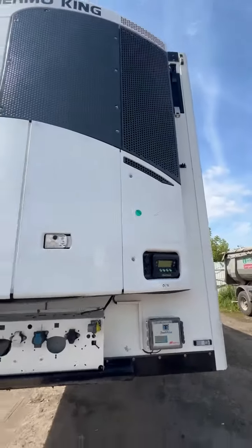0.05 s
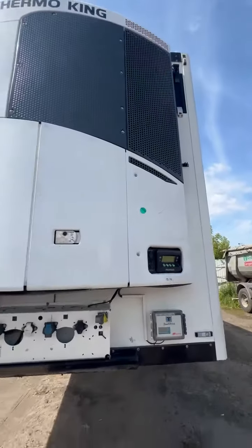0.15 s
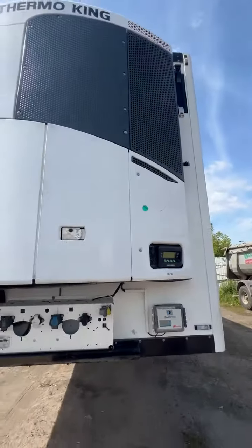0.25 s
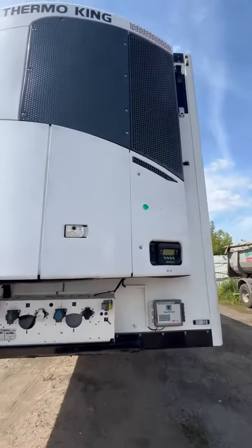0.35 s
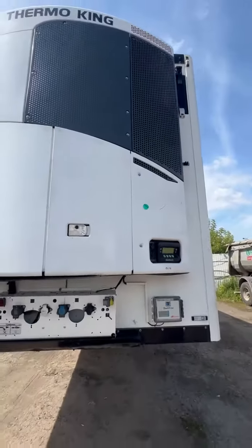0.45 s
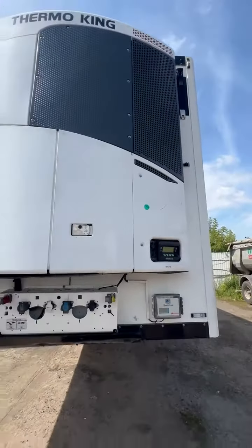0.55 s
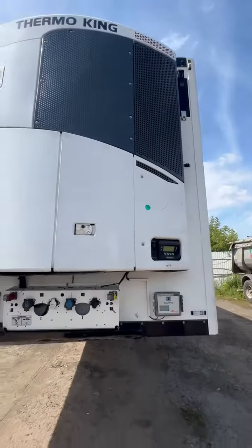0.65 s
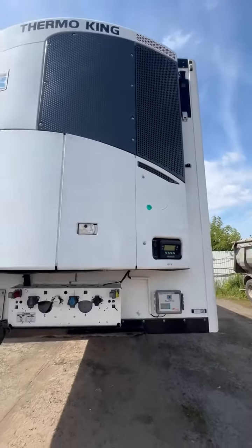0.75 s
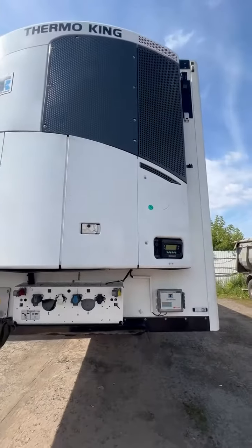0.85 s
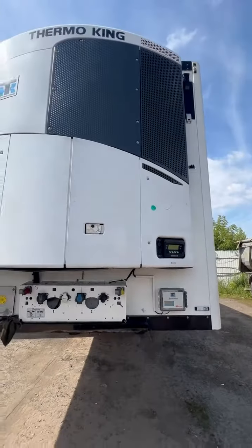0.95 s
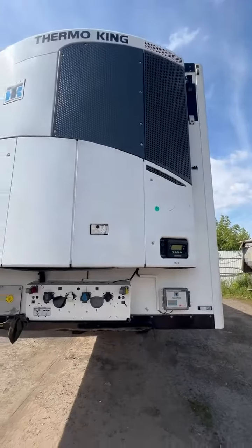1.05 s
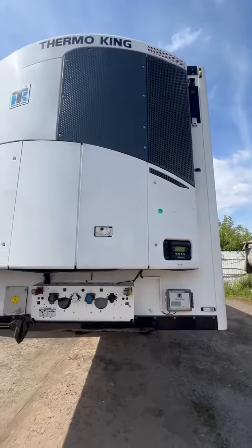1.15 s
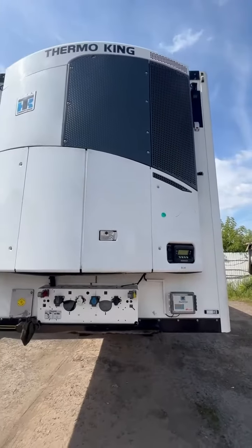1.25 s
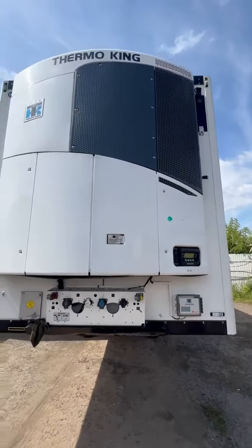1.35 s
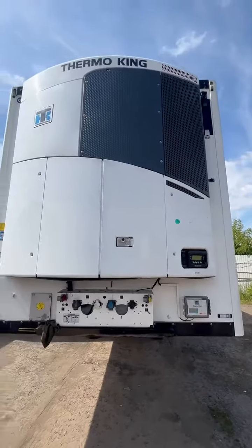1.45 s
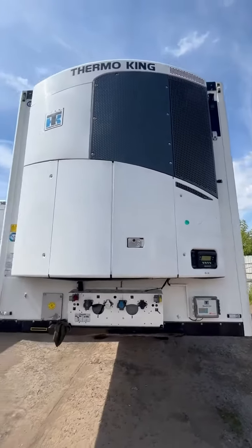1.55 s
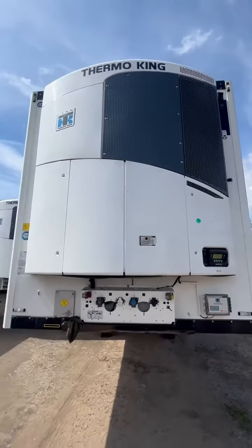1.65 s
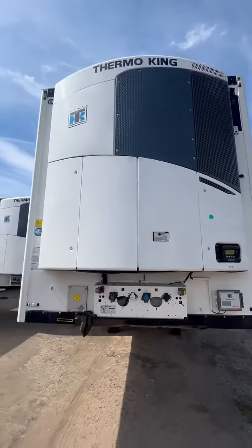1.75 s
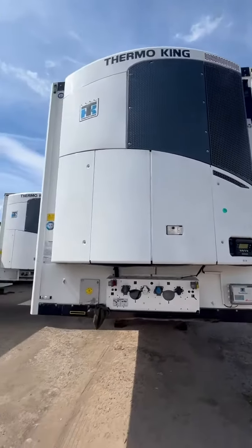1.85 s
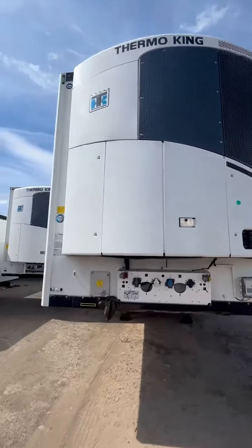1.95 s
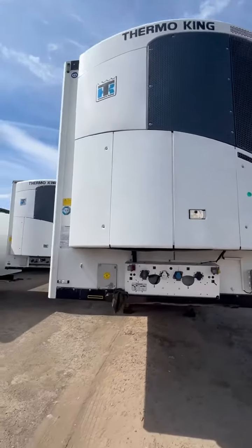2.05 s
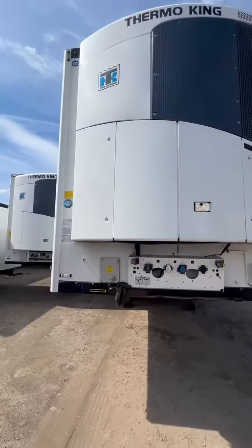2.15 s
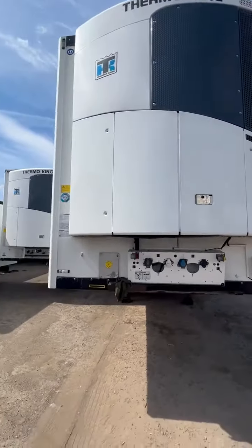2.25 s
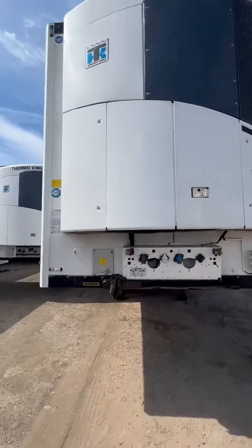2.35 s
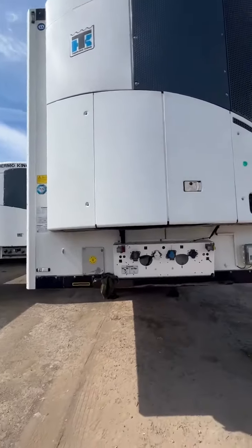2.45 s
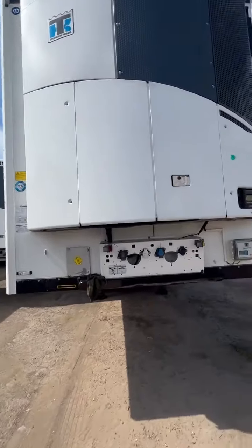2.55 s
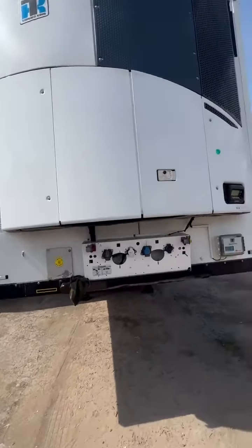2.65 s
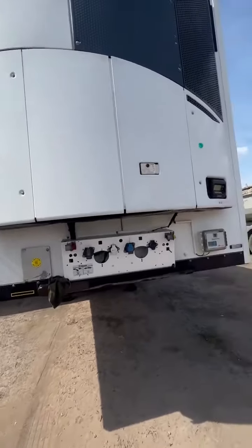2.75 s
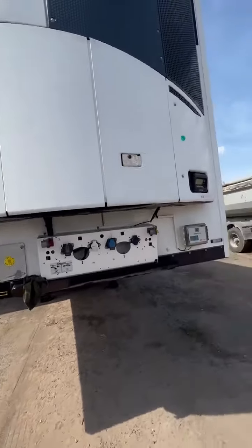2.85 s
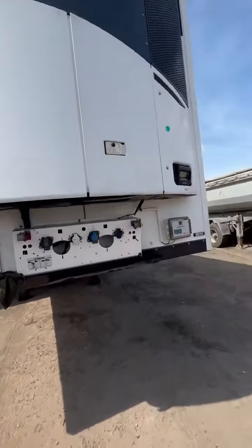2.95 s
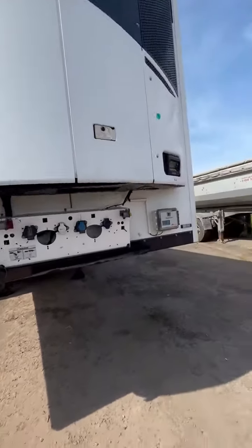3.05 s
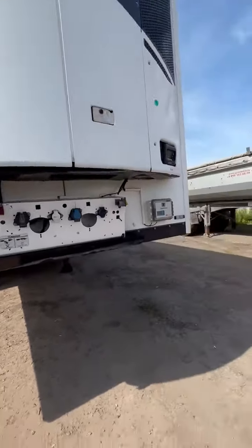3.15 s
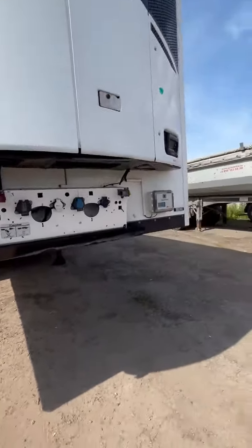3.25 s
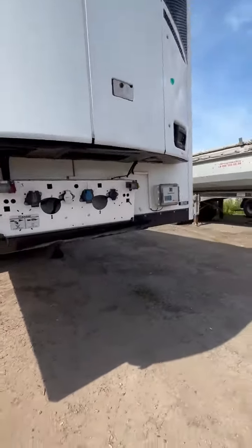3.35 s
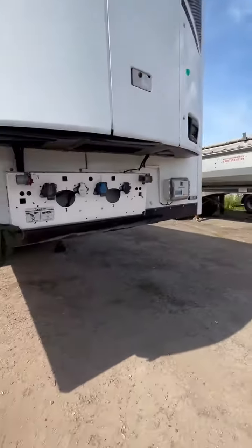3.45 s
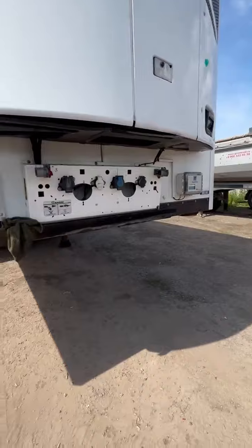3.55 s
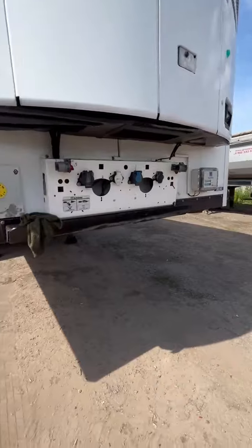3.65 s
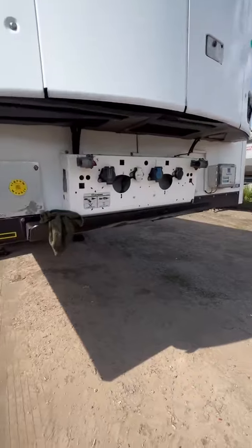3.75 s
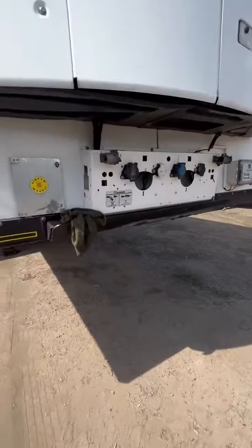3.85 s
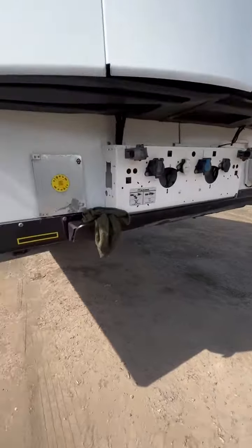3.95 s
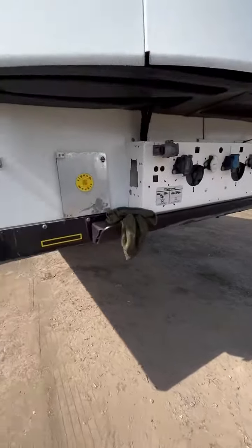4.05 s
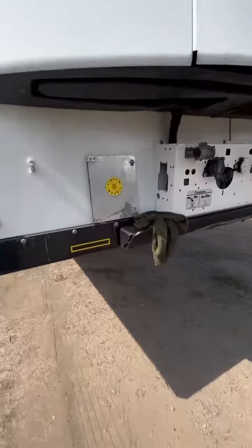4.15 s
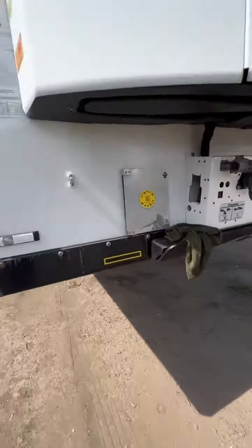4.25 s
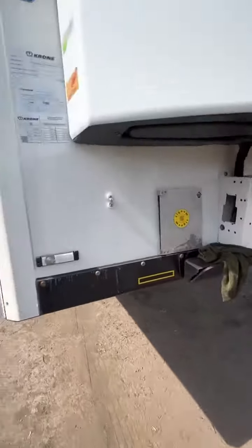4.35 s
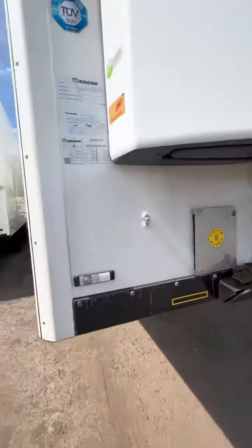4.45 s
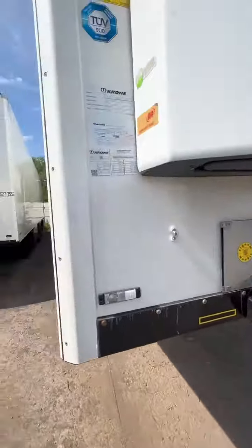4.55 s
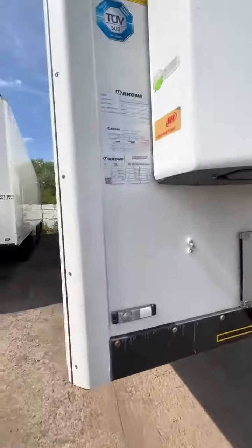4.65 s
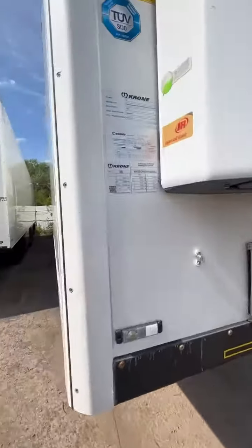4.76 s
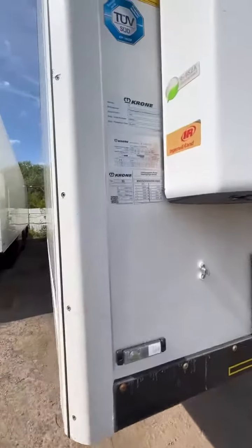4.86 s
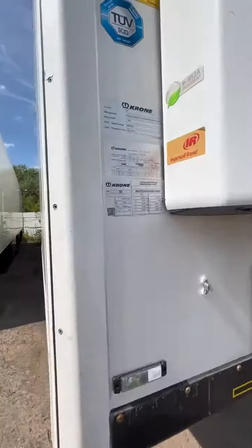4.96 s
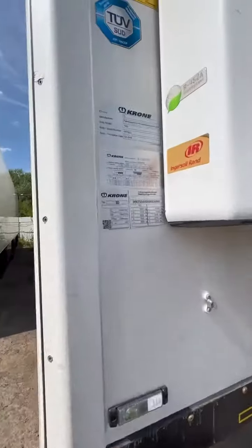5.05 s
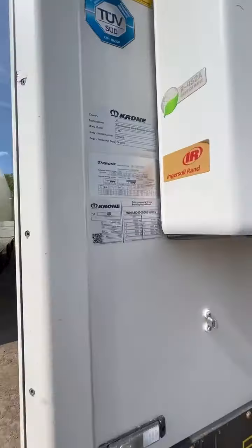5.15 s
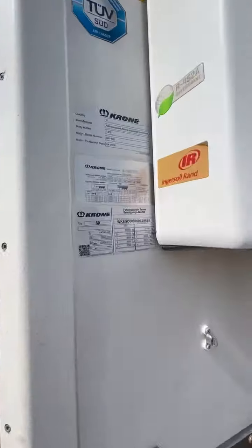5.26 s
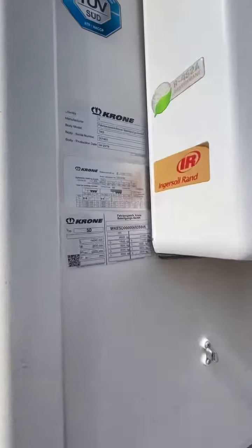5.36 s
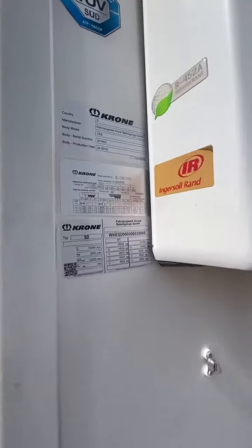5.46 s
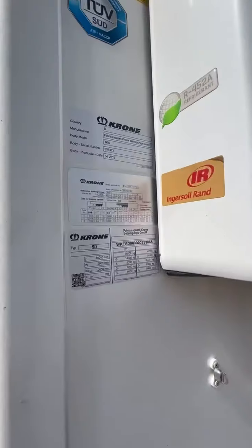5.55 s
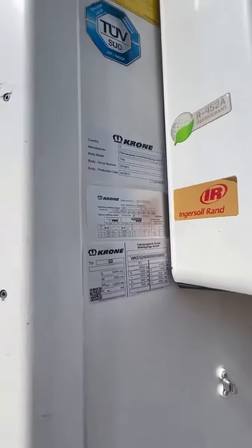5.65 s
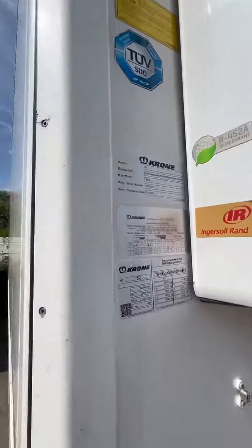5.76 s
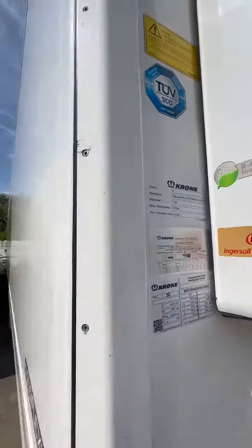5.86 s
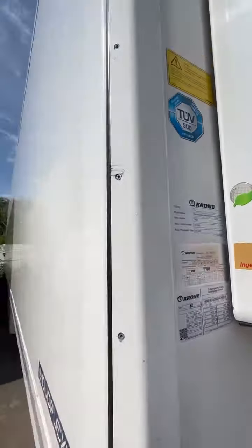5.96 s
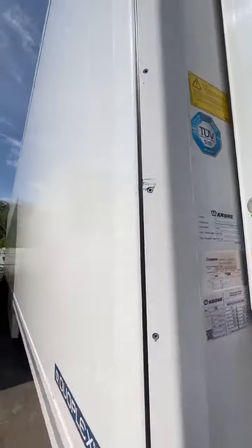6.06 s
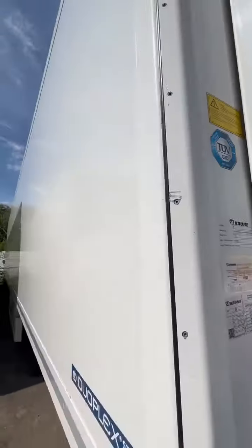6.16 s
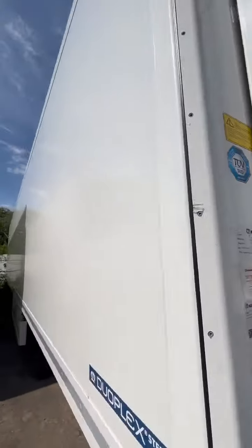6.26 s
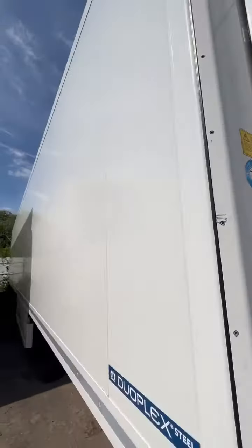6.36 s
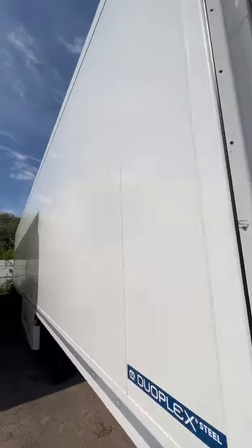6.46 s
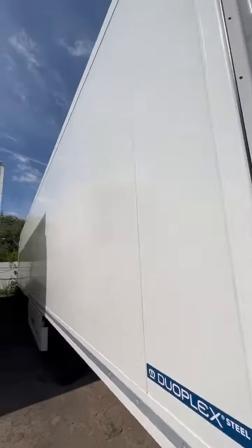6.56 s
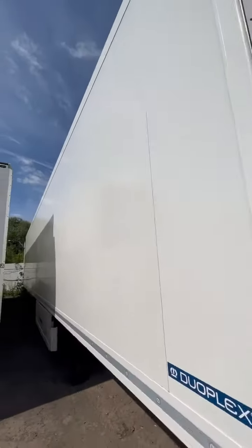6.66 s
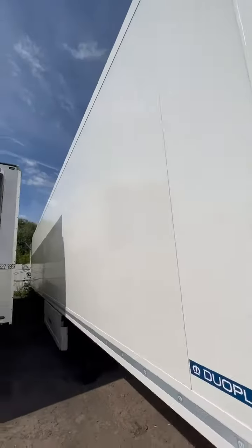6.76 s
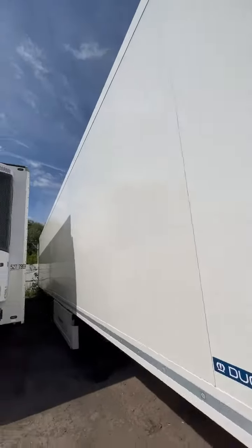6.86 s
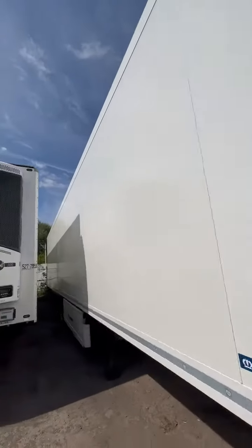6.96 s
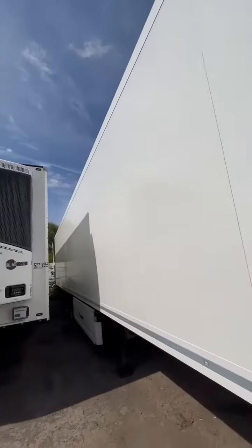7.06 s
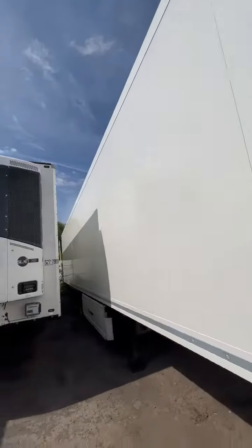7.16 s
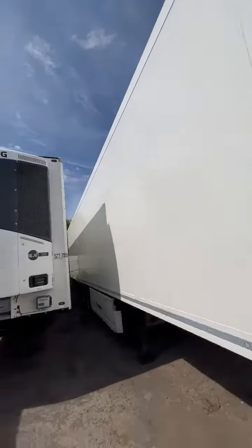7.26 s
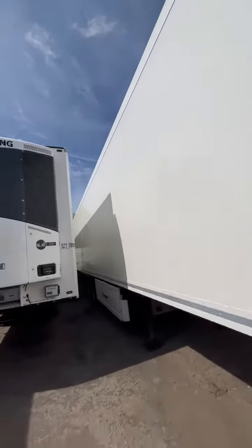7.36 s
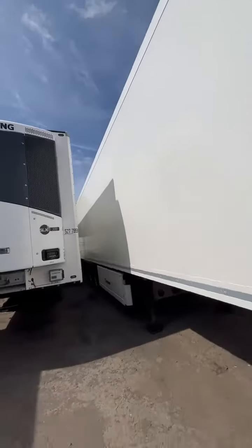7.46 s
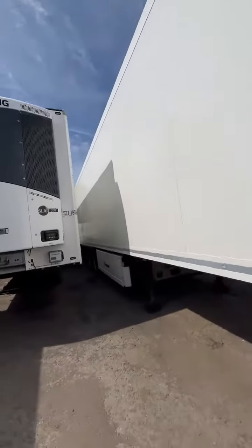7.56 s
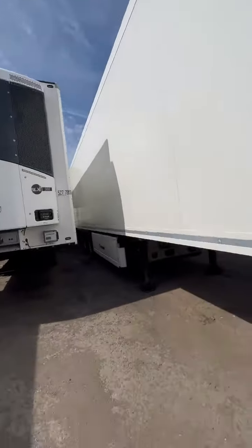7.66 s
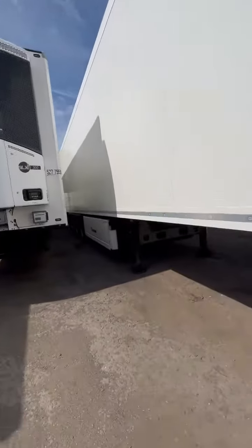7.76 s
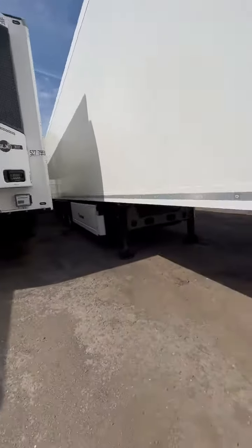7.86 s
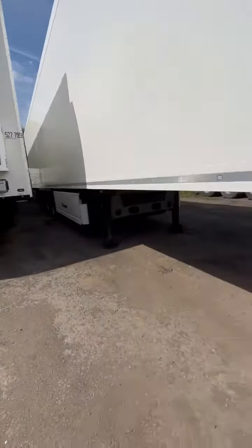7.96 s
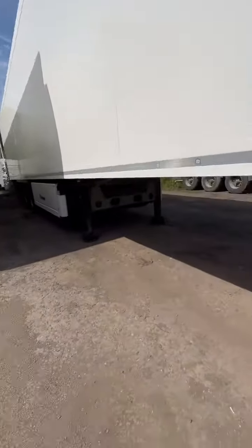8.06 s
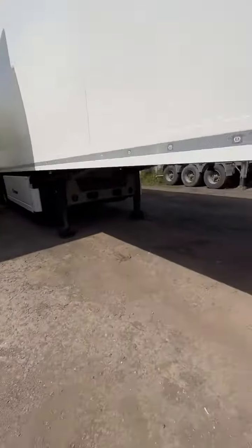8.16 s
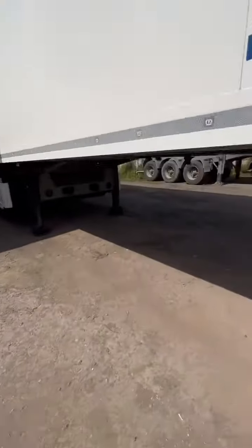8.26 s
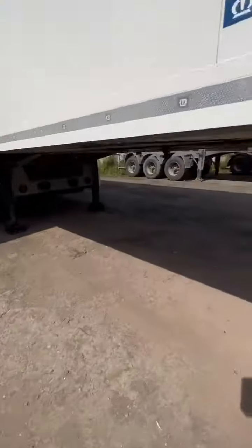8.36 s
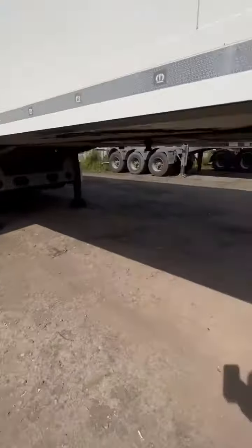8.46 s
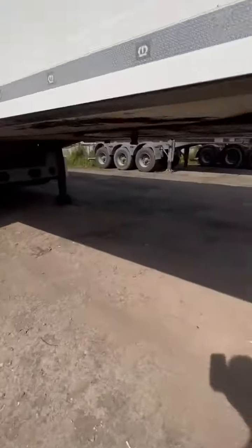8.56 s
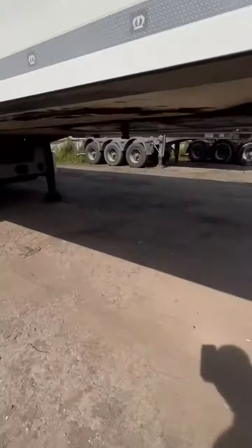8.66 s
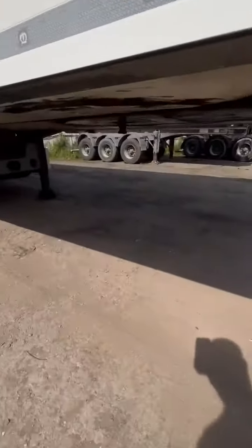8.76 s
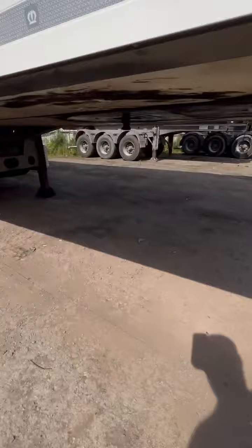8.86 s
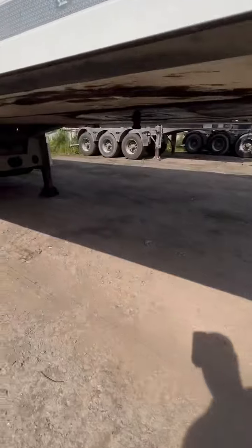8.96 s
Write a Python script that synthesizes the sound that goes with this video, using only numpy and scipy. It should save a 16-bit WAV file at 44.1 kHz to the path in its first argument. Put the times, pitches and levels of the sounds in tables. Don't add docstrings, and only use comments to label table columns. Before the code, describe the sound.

A handheld microphone passes a running trailer refrigeration engine in an open yard. A steady low throb carries quick metallic clatter, light tapping and blowing fan air. Close below the unit it becomes louder and boomier, with lumpy wind bumps strongest just before six seconds. Along the trailer side the clatter and hiss recede, leaving muffled drone and rumble with small stones clicking near the end.

```python
import sys
import numpy as np
from scipy import signal
from scipy.fft import rfft, irfft
from scipy.io import wavfile
from scipy.ndimage import uniform_filter1d, minimum_filter1d

SR = 44100
rng = np.random.default_rng(int(sys.argv[2]) if len(sys.argv) > 2 else 0)


def volts_from_db(level):
    exponent = np.asarray(level, float) / 20
    return 10 ** exponent


def store_pcm(level_fs):
    pcm = np.round(np.clip(level_fs, -1, 1) * 32767).astype(np.int16)
    wavfile.write(sys.argv[1], SR, np.atleast_2d(pcm).T)


N = 397782
T = np.arange(N) / SR
FIRING_HZ = 49.46

# (time [s], nearness [dB], open view of the grille [dB],
#            extra path of the ground echo [m], extra path of the wall echo [m])
WALK = [(0, 0, 0, 1.05, 3.05), (.9, -.8, -.4, 1.08, 2.97), (1.8, -.9, -.9, 1.23, 2.95),
        (2.4, .3, .3, 1.24, 2.86), (3, 1.2, 2.4, 1.02, 2.78), (3.5, 2.7, 1.9, 1.94, 3.16),
        (4.2, 4.4, 1.5, 2.08, 3.09), (4.8, 5.5, 1.6, 1.81, 3), (5.5, 6.9, 2.5, 1.92, 3.09),
        (6, 3.8, 0, 2.09, 3.16), (6.6, -.1, -4.6, 1.97, 3.03), (7.2, -3, -10.2, 1.77, 2.45),
        (7.8, -2.7, -12.8, 1.33, 1.97), (8.4, 2.2, -11.5, 1.08, 1.9), (9.02, 1.8, -11.5, .78, 1.6)]
STATIONS = [
    1.8,
    3.2,
    4.4,
    5.8,
    7.3,
    8.6,
]
# (time [s], hidden share of the housing [0-1])
CORNER = [
    (6.2, 0.0083),
    (7.3, 0.54),
]
# (time [s], side share)
FACING = [(0, 1.2), (2.5, 1.2), (4, 0.66), (5.5, 0.95), (6.4, 0.18), (7.2, -0.29), (8.2, 0.83),
          (9.02, -0.17)]
# (frequency [Hz], likeness [0-1], left-right [dB], left leads [rad])
PORTS = [(60, 1, 0.5, 0.076), (202, 1, -1.4, 0.018), (400, 1, 3.5, 0.72), (720, 0.77, 5, 1.95),
         (1115, 0.089, 9.5, 2.83), (1540, 0.68, 1, 5.92), (2480, 1, -1, 4.68), (5350, 0.09, 1.5, 6),
         (9000, 0.57, -1, 5.17)]
CYLINDERS = [-5, 0, -1.6, -7]


def evened(x):
    return x / np.sqrt(np.mean(x ** 2) + 1e-20)


def read(points, hz, axis=1):
    points = np.array(points)
    return np.interp(np.log(hz + 1), np.log(points[:, 0] + 1), points[:, axis])


def curve(rows, axis=1):
    rows = np.array(rows)
    return np.interp(T, rows[:, 0], rows[:, axis])


def drift(top_hz):
    coarse = T[::256]
    waves = 0
    for hz in np.geomspace(.15, top_hz, 16):
        waves = waves + np.sin(2 * np.pi * (hz * coarse + rng.random())) / np.sqrt(hz)
    return np.interp(T, coarse, evened(waves))


def heard(start_db, near, view):
    return start_db + near * curve(WALK, axis=1) + view * curve(WALK, axis=2)


def echoes(hz):
    ground, wall, sound_m_per_s = .5, .64, 343
    lag = -2j * np.pi * hz / sound_m_per_s
    from_ground = ground * np.exp(lag * curve(WALK, axis=3))
    from_wall = wall * np.exp(lag * curve(WALK, axis=4))
    return 20 * np.log10(abs(1 + from_ground + from_wall) + .02)


def tone(turns, hz, level_db, loose=1):
    facing = curve(FACING)
    lean_db = read(PORTS, hz, axis=2) * facing / 2
    nearest_lead = np.angle(np.exp(1j * read(PORTS, hz, axis=3)))
    lead = nearest_lead * facing / 2
    angle = 2 * np.pi * (turns + loose * rng.random())
    left = volts_from_db(lean_db) * np.cos(angle + lead)
    right = volts_from_db(-lean_db) * np.cos(angle - lead)
    return np.sqrt(2) * volts_from_db(level_db) * np.array([left, right])


def spread(pair, colour, patchy_db, shade_db=0):
    hz, t, (a, b) = signal.stft(pair, SR, nperseg=1024, noverlap=768)
    patches = uniform_filter1d(rng.standard_normal(a.T.shape), size=40, axis=0)
    patches = uniform_filter1d(patches, size=8, axis=1)
    shape = volts_from_db(read(colour, hz)[:, None] + patchy_db * evened(patches).T)
    hidden = np.interp(t, *np.transpose(CORNER))
    shape *= volts_from_db(-shade_db * np.outer(np.log2(hz / 400 + 1), hidden))
    same = np.clip(read(PORTS, hz), 0, 1)[:, None]
    facing = np.interp(t, *np.transpose(FACING))
    lean = volts_from_db(np.outer(read(PORTS, hz, axis=2), facing) / 2)
    lead = np.exp(1j * read(PORTS, hz, axis=3))[:, None]
    left = lean * lead * a
    right = (same * a + np.sqrt(1 - same ** 2) * b) / lean
    out = signal.istft(shape * np.array([left, right]), SR, nperseg=1024, noverlap=768)[1][:, :N]
    return out / np.sqrt(np.mean(out.mean(0) ** 2))


def throb(fired, decay, floor):
    cylinder = fired.astype(int) % len(CYLINDERS)
    strength = volts_from_db(np.array(CYLINDERS)[cylinder])
    phase = fired % 1
    return evened(floor + strength * np.sqrt(phase / decay) * np.exp(-phase / decay))


def habit(fired, repeat):
    size = 3560
    place = (fired / len(CYLINDERS) % 1 * size).astype(int)
    turn = np.pi * (0.293 * T + 0.2 * drift(0.96))
    cycles = rng.standard_normal((2, 2, size))[:, :, place]
    fresh = np.sqrt(1 - repeat ** 2) * rng.standard_normal((2, N))
    return repeat * (cycles[0] * np.cos(turn) + cycles[1] * np.sin(turn)) + fresh


def hum(fired):
    # (firing multiple, level [dB])
    pipe = [(1, -27.5), (2, -21), (3, -29.5), (4, -34.5)]
    # (crank order, in front [dB], walking up [dB], in the nook below the unit [dB], along the side [dB])
    block = [(5, -45, -43, -42, -56), (7, -44, -54, -47, -49), (9, -54, -51, -47, -46),
             (10, -39, -38, -30, -46), (11, -36, -40, -35, -42), (12, -37, -41, -27, -38),
             (13, -46, -45, -40, -54), (14, -41, -33, -31, -47), (15, -42, -45, -38, -43),
             (16, -53, -41, -46, -49), (17, -52, -51, -39, -50), (18, -45, -45, -32, -46),
             (19, -47, -44, -36, -50), (20, -51, -46, -47, -55), (22, -53, -52, -42, -53),
             (23, -55, -57, -47, -58), (24, -51, -54, -45, -48), (25, -54, -62, -50, -60),
             (28, -56, -52, -40, -55), (29, -56, -60, -49, -62), (31, -62, -60, -51, -66),
             (32, -53, -56, -47, -66), (34, -61, -62, -45, -67), (38, -58, -62, -54, -68)]
    out = 0
    for k, db in pipe:
        level_db = db + curve(WALK) + echoes(round(k) * FIRING_HZ) + .5 * drift(6)
        out = out + tone(round(k) * fired, k * 21.0, level_db, loose=0)
    for order, front_db, near_db, nook_db, side_db in block:
        further_db = side_db - 3
        level_db = np.interp(T, STATIONS, [front_db, near_db, nook_db, nook_db, side_db, further_db])
        out += tone(order * fired / 2, order * 24.8, level_db + 1.8 * drift(2) + .5)
    return out


def knock(fired):
    # (frequency [Hz], level [dB])
    open_colour = [(800, -29), (1200, -2), (1450, -5), (1750, -1), (2250, -3), (2950, -4.5), (3600, -11),
                   (4200, -21), (5500, -30)]
    # (frequency [Hz], level [dB])
    shaded_colour = [(800, -40), (1200, -3), (1450, -10.5), (1750, -9), (2250, -2), (2800, -6), (3600, -11),
                     (4200, -17.5), (5500, -29)]
    drive = habit(fired, repeat=.65) * throb(fired, decay=.25, floor=.8)
    hidden = np.clip(curve(CORNER), 0, 1)
    facing = spread(drive, open_colour, patchy_db=1.03)
    shaded = spread(drive, shaded_colour, patchy_db=0.1)
    return volts_from_db(heard(-37.5, near=0.042, view=0.94)) * ((1 - hidden) * facing + hidden * shaded)


def taps(fired):
    # (place in the cycle [0-1], ring [Hz], in front [dB], close by [dB])
    tappings = [(.25, 1760, -32.5, -38), (.08, 1800, -38, -40), (.25, 1110, -39, -49),
                (.79, 1100, -44, -48), (.64, 2270, -43, -40), (.64, 2920, -41, -47), (.48, 1720, -42, -42),
                (.82, 2900, -49, -44), (.77, 1850, -40, -44)]
    ring_s, uneven_s, cycle_hz = .0022, .0004, 12.38
    shade_db = 1.4 * np.minimum(curve(WALK, axis=2), 0)
    out = 0
    for place, hz, *levels_db in tappings:
        cycles = fired / len(CYLINDERS) - place + 1
        late, strength, pitch = rng.standard_normal((120, 3))[cycles.astype(int)].T
        since = np.maximum(cycles % 1 / cycle_hz - uneven_s * (late + 2), 0)
        ring = since / ring_s * np.exp(1 - since / ring_s)
        uneven_db = .9 * strength + .7 * drift(1.5)
        turns = hz * (1 + .02 * pitch) * since
        level_db = np.interp(T, STATIONS[1:3], levels_db) + shade_db + uneven_db
        out = out + ring * tone(turns, hz, level_db)
    return out


def air(fired):
    # (frequency [Hz], level [dB])
    rumble_colour = [(22, -50), (34, -5), (60, 9), (85, -2), (120, 5.5), (170, -5.5), (230, 2), (300, -6.5),
                     (400, -8), (600, -48)]
    roar_colour = [(200, -50), (300, -14), (400, 1.5), (520, -1.5), (700, -4.5), (950, -8.5), (1130, -11),
                   (1400, -22.5), (1900, -47)]
    hiss_colour = [(3000, -40), (4000, 0.5), (5300, -0.5), (6000, 1), (7000, -3.5), (9500, -9.5),
                   (11500, -23), (14000, -36)]
    # (time [s], level
    # [dB])
    nook = [(1.8, 5), (2.3, 0), (3.2, 3), (4.9, -2), (5.4, 3), (5.9, 1), (7.4, 7), (8.3, 0.5)]
    # (time [s], level [dB])
    outlet = [(3.1, -3), (3.55, -0.5), (4.2, 2), (4.45, -3), (5.7, -1.5), (6.4, 0), (7.5, -2), (8.4, 0)]
    blade_hz, blade_db = 252.4, -35.5
    rumble = spread(rng.standard_normal((2, N)), rumble_colour, patchy_db=.4)
    shaken = habit(fired, repeat=.4) * throb(fired, decay=0.19, floor=2.9)
    roar = spread(shaken, roar_colour, patchy_db=2.0, shade_db=3.5)
    pulsing = rng.standard_normal((2, N)) * throb(fired, decay=.3, floor=1.8)
    hiss = spread(pulsing, hiss_colour, patchy_db=.7)
    blade_level_db = blade_db + curve(WALK) + echoes(blade_hz) + 0.6 * drift(1.1)
    out = tone(blade_hz * T, blade_hz, blade_level_db)
    out += volts_from_db(heard(-29, near=0.52, view=0.28)) * rumble
    out += volts_from_db(heard(-38, near=1, view=0.15) + curve(nook)) * roar
    flutter_db = .9 * drift(14)
    out += volts_from_db(heard(-45, near=-0.51, view=1.07) + curve(outlet) + flutter_db) * hiss
    return out


def buffet():
    # (frequency [Hz], level per Hz [dB])
    draught_colour = [(20, -45), (40, -26), (80, 7), (275, -15), (460, -13.5), (850, -29), (1300, -35),
                      (2000, -58)]
    # (time [s], level [dB], length [s])
    gusts = [(2.709, -28.5, 0.18), (2.913, -28, 0.14), (3.72, -31, 0.13), (3.967, -27, 0.066),
             (4.177, -24, 0.27), (4.445, -29, 0.058), (4.914, -23, 0.26), (5.26, -24, 0.06),
             (5.55, -18, 0.1), (5.686, -22, 0.054), (5.831, -13, 0.041), (6.013, -18, 0.14),
             (6.235, -30, 0.073), (7.1, -28.5, 0.18), (8.645, -31, 0.037), (8.947, -30, 0.19)]
    hz = np.fft.rfftfreq(N, 1 / SR)
    noise = rfft(rng.standard_normal((2, N)))
    push = evened(irfft(noise * volts_from_db(read(draught_colour, hz)), N))
    swell = 0
    for s, db, length in gusts:
        swell = swell + volts_from_db(db - 3.0) * np.exp(-((T - s) / (0.43 * length)) ** 2)
    lumps = swell * volts_from_db(1.5 * drift(30))
    return lumps * (np.array([push[0], -push[0]]) + 0.22 * push[1])


def ticks():
    # (time [s], peak level [dB], ring [Hz])
    grit = [
        (7.0569, -51, 2873),
        (7.2624, -47, 1630),
        (7.7034, -39, 2180),
        (7.9473, -34, 2360),
        (8.0511, -31, 1940),
        (8.2294, -48, 1710),
        (8.4312, -43, 2130),
        (8.4891, -29, 2360),
        (8.5694, -30, 1620),
        (8.9044, -35.5, 4600),
    ]
    out, t = np.zeros(N), np.arange(600) / SR
    for s, db, hz in grit:
        ring = np.sin(2 * np.pi * hz * t) + 0.14 * rng.standard_normal(len(t))
        click = volts_from_db(db - 9.0) * ring * np.exp(-t / 0.0033)
        part = out[round(s * SR):][:len(t)]
        part += click[:len(part)]
    return out * volts_from_db(np.array([[-.6], [.6]]))


def scene():
    hunt_hz = .04
    fired = np.cumsum(FIRING_HZ + hunt_hz * drift(.8)) / SR
    return hum(fired) + knock(fired) + taps(fired) + air(fired) + buffet() + ticks()


def thinned(x, margin_db):
    # (frequency [Hz], level [dB])
    scarce = [(1200, -12), (2500, -1), (4500, -1), (5400, 1.4), (6800, 1), (8500, .1), (10300, 1.6),
              (11500, 1)]
    hz, t, z = signal.stft(x, SR, nperseg=1024, noverlap=768)
    power = abs(z[:512].reshape(128, 4, -1)) ** 2
    band_db = 10 * np.log10(uniform_filter1d(power.mean(1), size=6, axis=1) + 1e-20)
    dip_db = band_db - uniform_filter1d(band_db, size=15, axis=0)
    quiet_db = band_db - band_db.mean(1, keepdims=True)
    scarce_db = read(scarce, hz[:512:4])[:, None]
    keep = dip_db + .16 * quiet_db > scarce_db - margin_db
    keep = minimum_filter1d(keep * 1., size=6, axis=1)
    z[:512] *= np.repeat(np.maximum(keep, .02), 4, axis=0)
    return signal.istft(z, SR, nperseg=1024, noverlap=768)[1][:N]


def band_limit(x):
    return signal.sosfilt(signal.butter(12, 11710, fs=SR, output="sos"), x)


def record(dry):
    knee, room = .7, .24
    ceiling = np.sign(dry) * (knee + room * np.tanh((abs(dry) - knee) / room))
    held = np.where(abs(dry) > knee, ceiling, dry)
    mid = thinned(held.mean(0), margin_db=3.5)
    side = thinned((held[0] - held[1]) / 2, margin_db=3.2)
    return band_limit(np.array([mid + side, mid - side]))


dry = scene()
out = record(dry)
store_pcm(out)
```